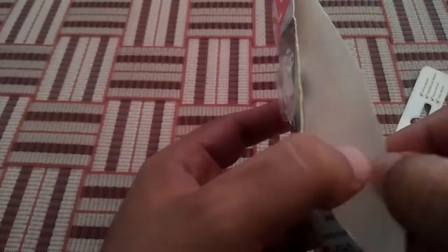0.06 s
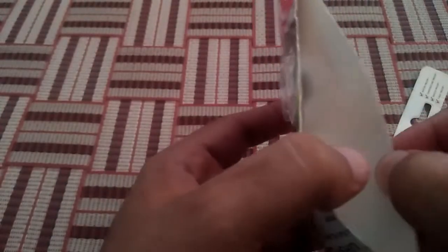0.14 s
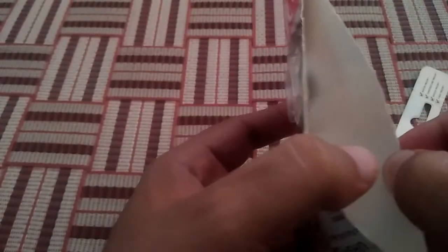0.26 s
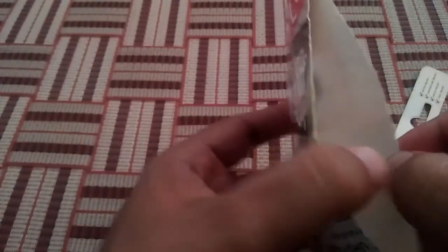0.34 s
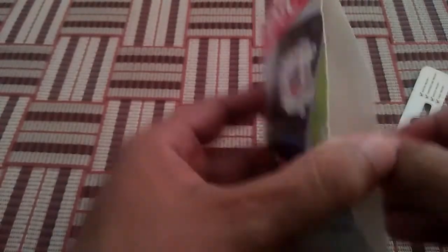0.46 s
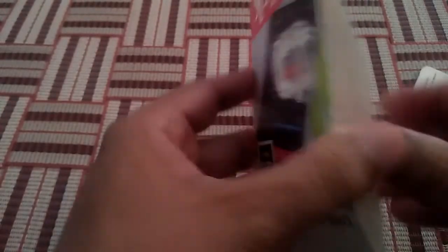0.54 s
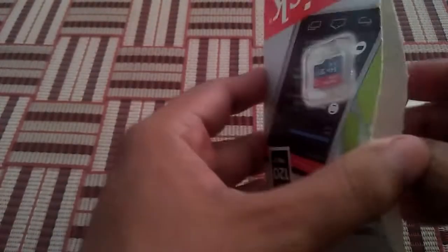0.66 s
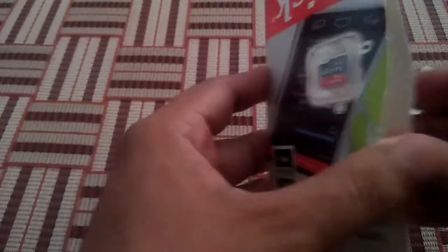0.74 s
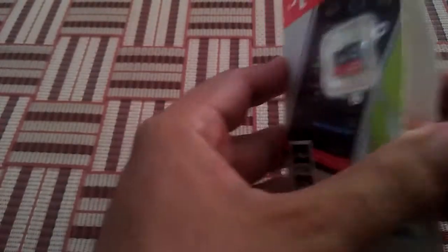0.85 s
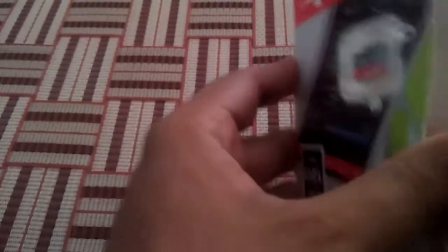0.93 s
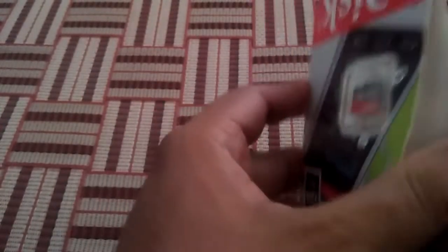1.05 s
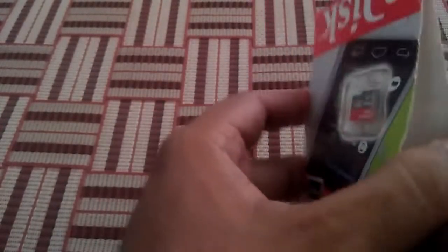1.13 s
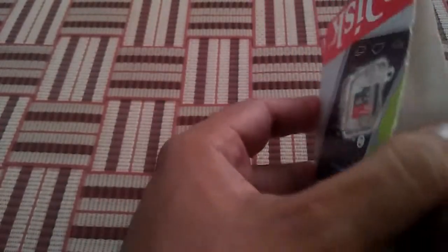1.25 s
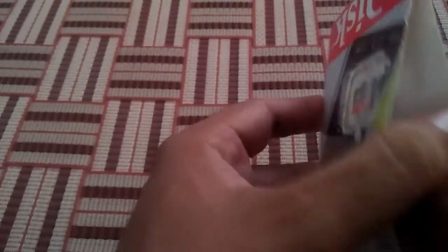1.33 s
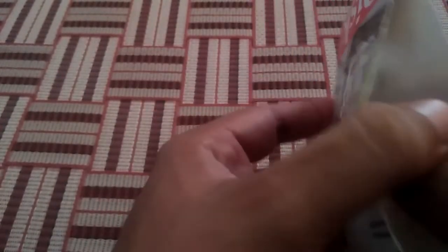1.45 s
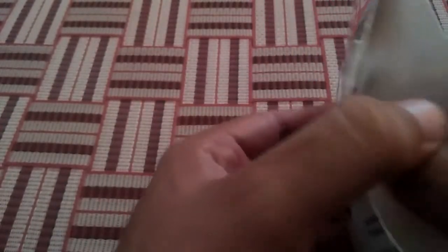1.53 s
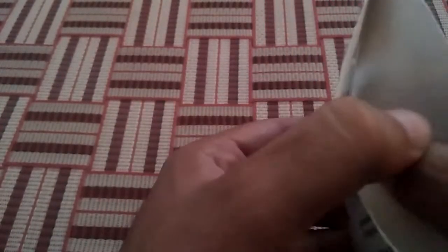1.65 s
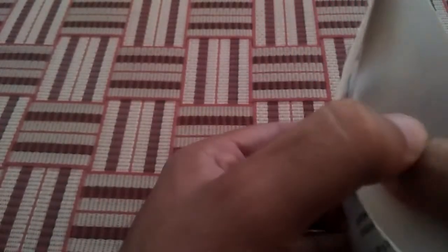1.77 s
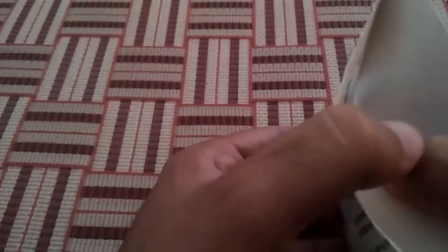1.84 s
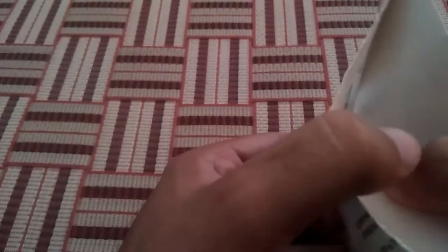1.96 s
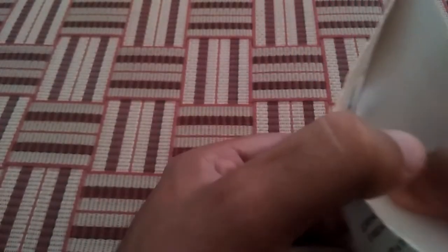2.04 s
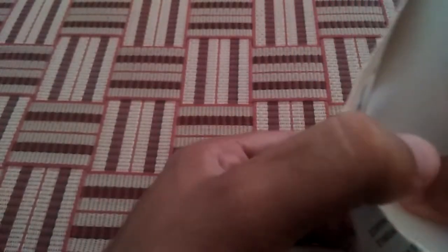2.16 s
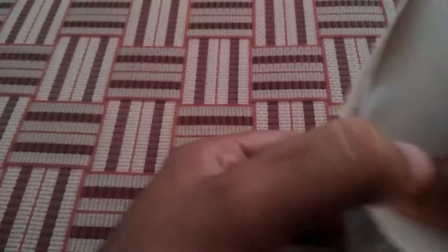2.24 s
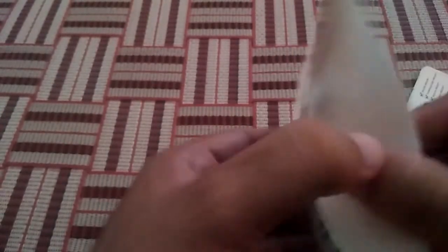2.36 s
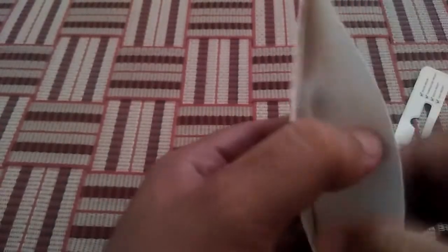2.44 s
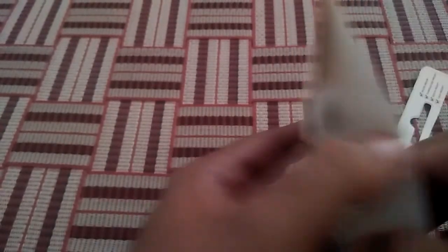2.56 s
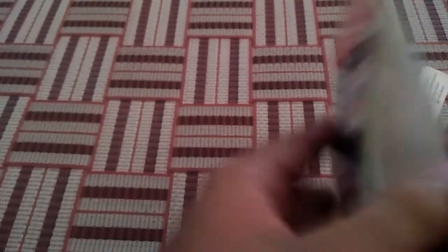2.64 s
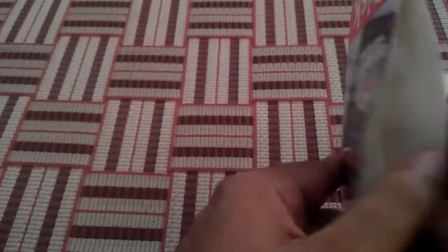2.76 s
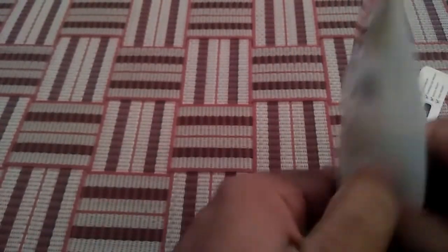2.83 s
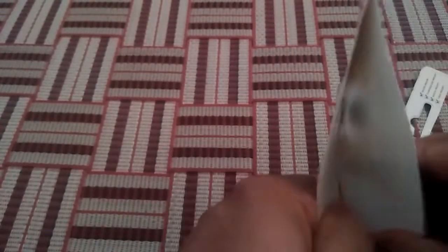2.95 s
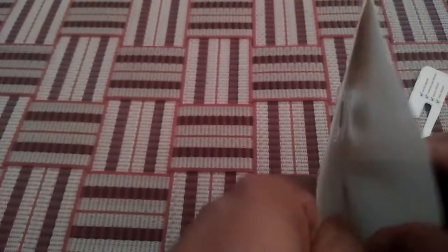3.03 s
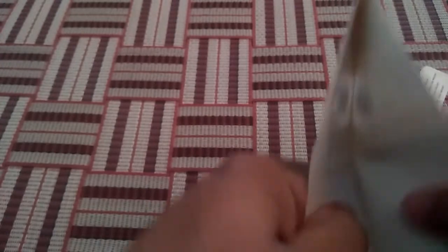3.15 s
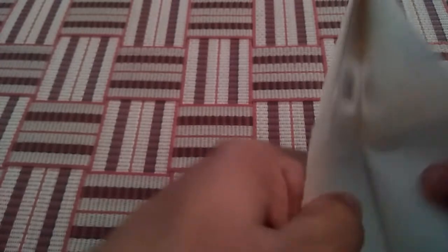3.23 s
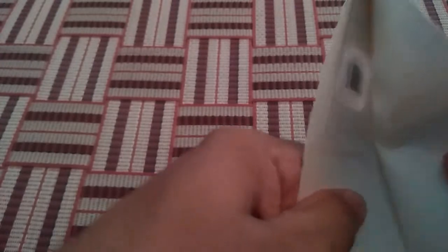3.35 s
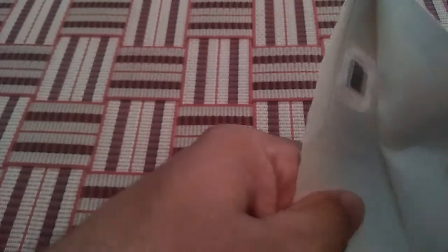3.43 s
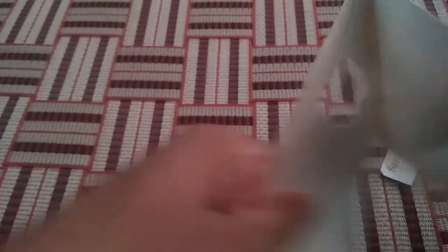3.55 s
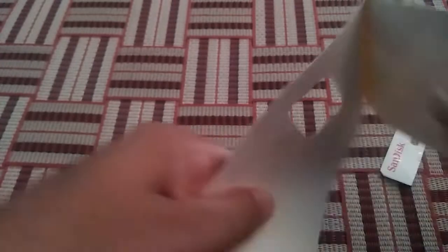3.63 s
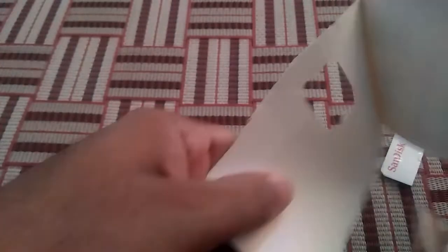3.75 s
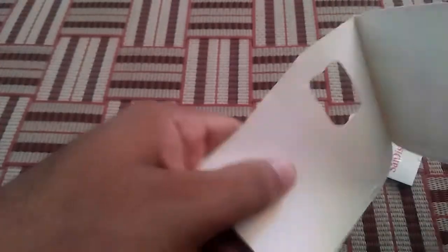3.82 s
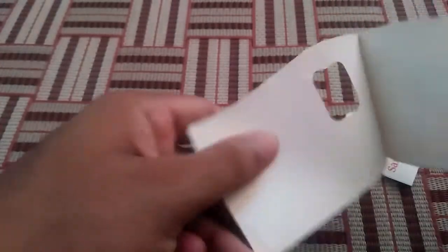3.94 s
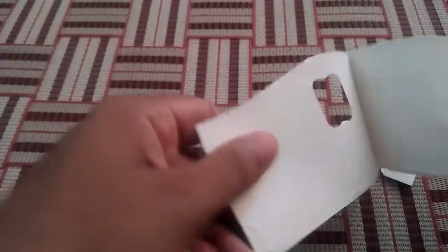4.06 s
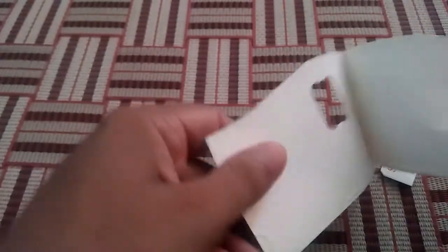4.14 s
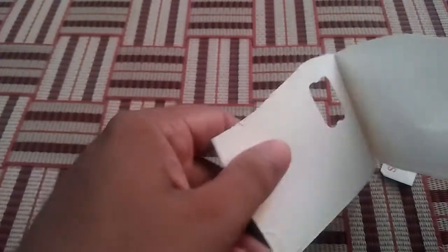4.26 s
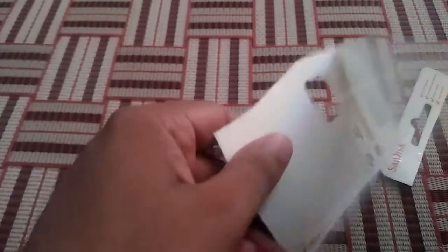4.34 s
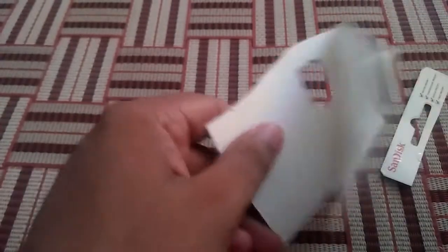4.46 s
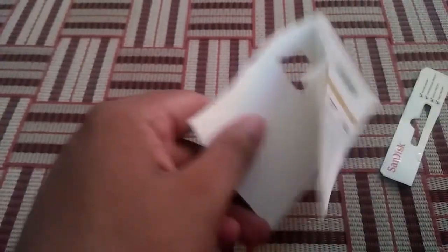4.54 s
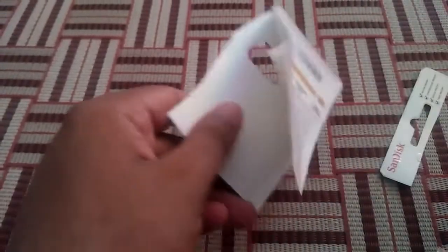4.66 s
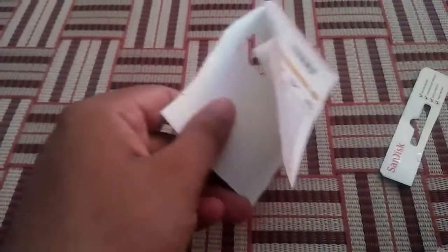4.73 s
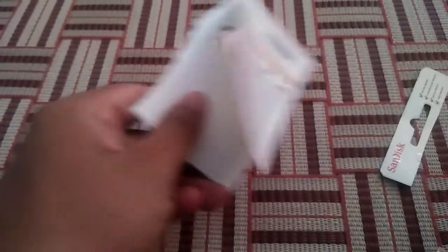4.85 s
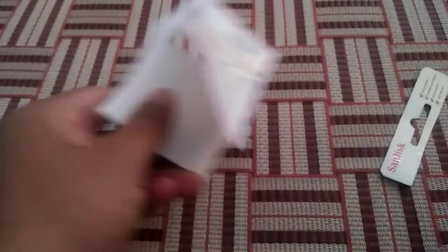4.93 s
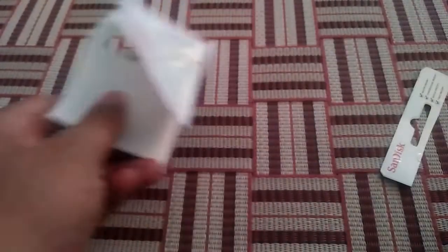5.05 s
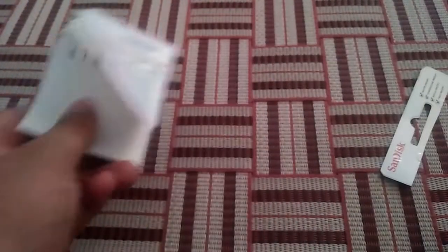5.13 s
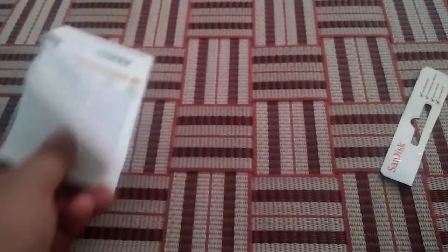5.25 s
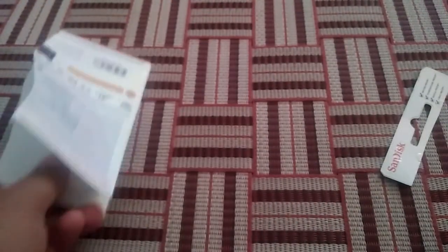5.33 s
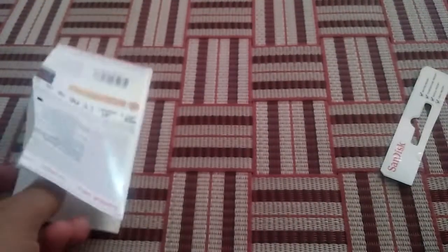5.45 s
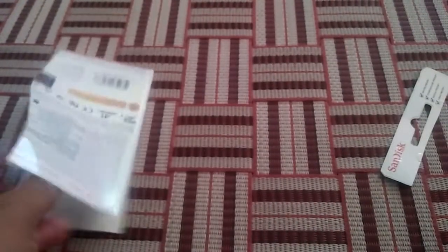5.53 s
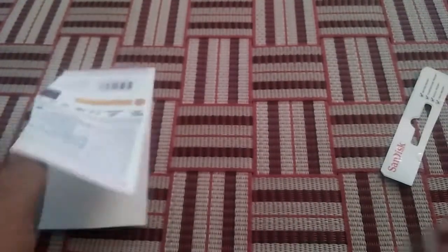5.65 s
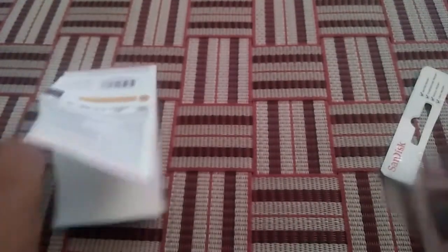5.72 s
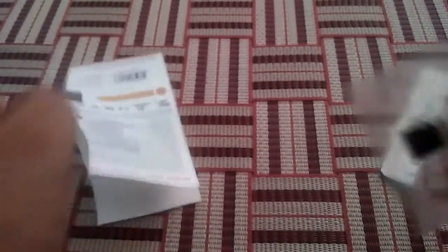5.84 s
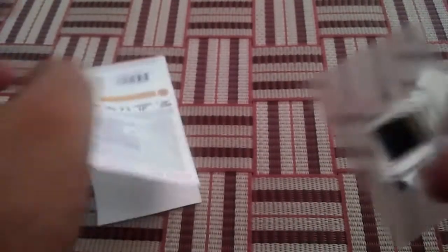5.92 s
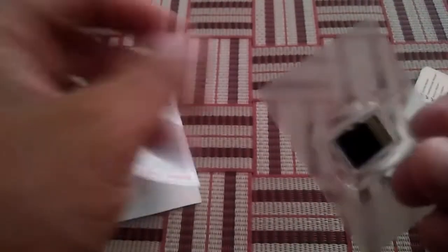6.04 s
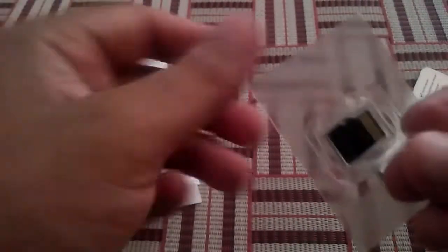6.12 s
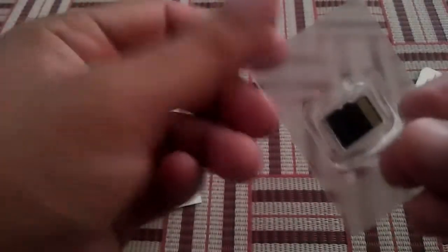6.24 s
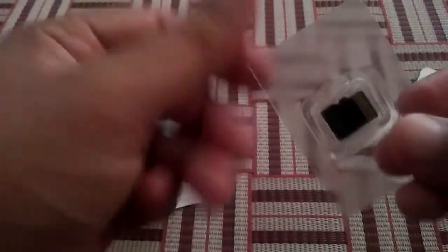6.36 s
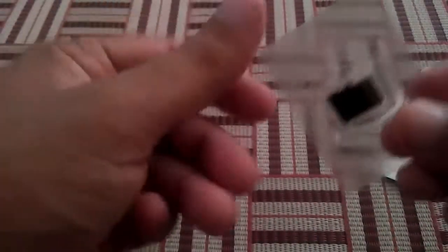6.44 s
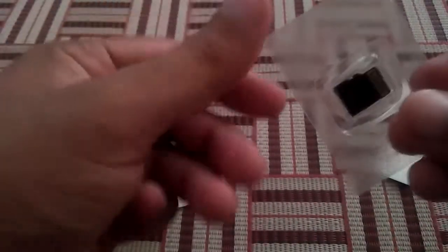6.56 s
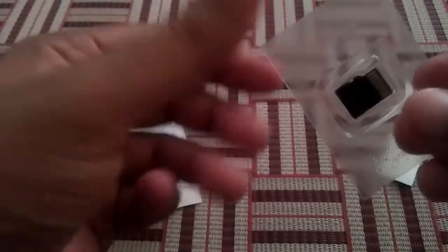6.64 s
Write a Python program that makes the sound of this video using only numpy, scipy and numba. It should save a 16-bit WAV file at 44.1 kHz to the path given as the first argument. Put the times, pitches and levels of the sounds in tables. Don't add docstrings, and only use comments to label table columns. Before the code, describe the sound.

Stiff cardboard packaging is opened by hand: bright clicks and faint rustling, a pause, a gentle fibrous peel dotted with crease snaps, then one hard crack and a fast tear ending in a cluster of plastic ticks. Afterwards come sparse paper flaps and clicks as it is set down. Close, dry, small-room sound with dull bumps from the support and a low room murmur.

```python
import sys
import numpy as np
from scipy import signal
from scipy.fft import rfft, irfft, next_fast_len
from scipy.io import wavfile
from scipy.ndimage import uniform_filter1d
from numba import njit

SR = 44100
rng = np.random.default_rng(int(sys.argv[2]) if len(sys.argv) > 2 else 0)


def store_wav(level_fs):
    pcm = np.round(np.clip(np.atleast_2d(level_fs), -1, 1) * 32767)
    wavfile.write(sys.argv[1], SR, pcm.T.astype(np.int16))


def boost_factor(decibels):
    exponent = np.asarray(decibels, float) / 20
    return 10 ** exponent


N = 294971

# time in seconds, level in dB, dullness in dB.
PEEL = [
    (1.76, -81, -1),
    (1.914, -63, -1),
    (2.075, -62.5, -3),
    (2.22, -57.5, -6),
    (2.275, -42.5, 1.5),
    (2.33, -61, 2.5),
    (2.45, -60.5, 3.5),
    (2.548, -57, 3),
    (2.595, -60.5, 1.5),
]


def level(x, db):
    return x * boost_factor(db) / np.sqrt(np.mean(x ** 2))


def even(x):
    return x / np.sqrt(uniform_filter1d(x ** 2, size=3000) + 1e-18)


def band(x, lo_hz, hi_hz, order=2):
    sos = signal.butter(order, [lo_hz, min(hi_hz, .45 * SR)], "band", fs=SR, output="sos")
    return signal.sosfilt(sos, x)


@njit
def svf(x, hz, width):
    y, b, l = np.empty(len(x)), 0., 0.
    for i in range(len(x)):
        g, k = np.tan(np.pi * hz[i] / SR), width / hz[i]
        v = (b + g * (x[i] - l)) / (1 + g * (g + k))
        b, l, y[i] = 2 * v - b, l + 2 * g * v, k * v
    return y


def walk(rate):
    k = int(SR / rate)
    held = np.repeat(rng.standard_normal(N // k + 1), k)
    return 1.3 * uniform_filter1d(uniform_filter1d(held, k), k)[:N]


def columns(table):
    s, *cols = np.transpose(table)
    return [np.interp(np.arange(N) / SR, s, c) for c in cols]


def fibres(rate, spread_db, puff_ms, bed_db):
    size_db = np.minimum(spread_db * rng.exponential(size=N), 22)
    sizes = (rng.random(N) < rate / SR) * boost_factor(size_db)
    puffs = signal.lfilter([1], [1, -np.exp(-1000 / puff_ms / SR)], sizes)
    return level(puffs, 0) + boost_factor(bed_db)


def pulls():
    # peak time in seconds, rise in ms, fall in ms, level in dB,
    # dullness in dB.
    handling = [(0.09, 81, 50, -65.5, -6.5), (0.18, 41, 60, -70, -6.5), (0.251, 31, 88.4, -45.5, 0),
                (0.385, 140, 30, -62, -8.5), (0.53, 30, 25, -65.5, 4.5), (0.69, 4.6, 45, -65, 6.5),
                (0.89, 43, 50, -49, 12), (1.025, 65, 40, -55, 9.5), (1.088, 54, 30, -63, -0.5),
                (1.163, 14, 22, -72.5, -1.5), (1.63, 150, 90, -78, 1.5), (2.79, 81, 90, -58, 1.5),
                (3.0, 62, 80, -57.5, 2), (3.075, 18, 130, -41, 0.5), (3.955, 29, 95, -52.5, 3.5),
                (4.15, 22, 15, -71, 2.5), (4.285, 37, 50, -71.5, -7.5), (4.437, 25.3, 25, -62, -6.5),
                (5.185, 30, 25, -73, -4.5), (5.212, 12, 75, -57.5, 3.5), (5.503, 44, 40, -64, 2.5),
                (5.753, 38, 75, -57, -2), (5.885, 15, 15, -78.5, -1)]
    # time in seconds, level in dB, dullness in dB.
    tear = [
        (3.202, -59, -4.5),
        (3.352, -56.5, -5),
        (3.524, -61.5, -3),
        (3.542, -54, -7.5),
        (3.622, -44, 3.5),
        (3.695, -27, 2),
        (3.755, -42, -0.5),
        (3.822, -54.5, 7),
        (3.928, -54.5, 1),
    ]
    edge_db, roundness = 20, 1.7
    body_per_quiet = 0.15
    t = np.arange(N) / SR
    total, dull = 1e-9, 0
    for peak, rise_ms, fall_ms, db, dull_db in handling:
        away = np.where(t < peak, (peak - t) / rise_ms, (t - peak) / fall_ms) * 1000
        drop_db = edge_db * np.minimum(away, 3) ** roundness
        gain = boost_factor(db - drop_db) * (away < 3)
        total = total + gain
        dull = dull + gain * (dull_db + body_per_quiet * np.minimum(drop_db, edge_db))
    for pull in (PEEL, tear):
        db, dull_db = columns(pull)
        active = 1. * (t > pull[0][0]) * (t <= pull[-1][0])
        gain = boost_factor(db) * uniform_filter1d(active, size=300)
        total, dull = total + gain, dull + gain * dull_db
    return total, dull / total


def rustle():
    # time in seconds, fold resonance in Hz, flap resonance in Hz.
    opening = [(0.1, 3480, 1040), (0.25, 5800, 1760), (0.4, 4800, 1290), (0.52, 2780, 940),
               (0.7, 3000, 1840), (0.9, 2950, 990), (1.03, 3350, 2150), (1.9, 5400, 2390),
               (2.25, 5100, 2060), (2.55, 5830, 1840), (2.8, 4880, 1200), (3.2, 3490, 1700),
               (3.59, 5200, 1800), (3.68, 4080, 1400), (3.85, 5670, 1200), (4.44, 3296, 1844),
               (5.25, 4000, 1980), (5.75, 6470, 1324)]
    # frequency in Hz, width in Hz, level in dB.
    card_modes = [
        (830, 470, 0.5),
        (2280, 510, -5.5),
    ]
    strength, dull_db = pulls()
    air_db = -3.5 - 1.1 * dull_db
    fold_hz, flap_hz = columns(opening)
    grain = fibres(rate=420, spread_db=3.8, puff_ms=1.2, bed_db=0.5)
    grain = even(grain * boost_factor(2.2 * walk(35)))
    rub = grain * rng.standard_normal(N)

    body = boost_factor(-1.5) * svf(svf(rub, flap_hz, 1100.0), flap_hz, 1100.0)
    for hz, width_hz, db in card_modes:
        drive = np.minimum(hz / flap_hz, 1) ** 2.1
        body = body + boost_factor(db) * drive * svf(rub, np.full(N, 1. * hz), 1. * width_hz)

    above = svf(svf(rub, 1.22 * fold_hz, 3400.0), 1.213 * fold_hz, 3400.0)
    above = above + boost_factor(-4.0) * svf(svf(rub, 1.7 * fold_hz, 6000.), 1.7 * fold_hz, 6000.)
    first = svf(svf(rub, fold_hz, 1000.), fold_hz, 1000.)
    fold = boost_factor(-1.5 * np.maximum(dull_db, 0)) * above + boost_factor(-1.5) * first

    air = band(rub, 5700, 21000) + boost_factor(-2.0) * svf(rub, 9800 + 1500 * walk(3.8), 730.0)
    mix = even(fold) + boost_factor(.6 * dull_db - 1.5) * even(body) + boost_factor(air_db + 4.0) * even(air)

    begin, end = PEEL[0][0], PEEL[-1][0]
    peeling, = columns([(begin - .1, 0), (begin, 1), (end, 1), (end + .1, 0)])
    gap_depth, gap_width_hz = .75, 1100.
    mix = mix - gap_depth * peeling * svf(mix, (fold_hz + flap_hz) / 2, gap_width_hz)
    return strength * mix


def snap(peak_db, ring_hz, air_db, thud_db, noise):
    t = np.arange(noise.shape[1]) / SR
    fade = np.minimum(t / 0.00061, 1) * np.exp(-t / 0.0022)
    slow = np.minimum(t / .002, 1) * np.exp(-t / .003)
    ring = svf(fade * noise[0], np.full(len(t), 1. * ring_hz), 0.11 * ring_hz)
    crack = band(fade * noise[0], 1000, np.clip(2.6 * ring_hz, 4000, 9000))
    air = band(fade ** 0.8 * noise[1], 6000, 18000)
    thud = band(slow * noise[2], 550, 1300)
    weights = boost_factor(np.array([-4., -7., air_db + 2.5, thud_db + 0.14]))
    parts = (ring, crack, air, thud)
    return boost_factor(peak_db) * sum(w * p / np.abs(p).max() for w, p in zip(weights, parts))


def snaps():
    # start in seconds, peak in dB, ring in Hz, air in dB.
    grip = [(0.0297, -46, 10180, -9.5), (0.0706, -55.5, 9180, -10.5), (0.17, -48.5, 9130, -2),
            (0.2253, -36.5, 6875, -18), (0.2497, -31.5, 7050, -30), (0.2881, -32, 7460, -25),
            (0.2984, -30.5, 14000, -15), (0.3074, -33.5, 6980, -21), (0.3645, -36.5, 9470, -10.5),
            (0.5201, -50, 1400, -29.5), (0.6887, -39, 1920, -44), (0.7172, -51, 2850, -32.5),
            (0.8673, -35, 1000, -19.5), (0.9052, -31.5, 1907, -23.5), (4.4352, -42, 1862, -18),
            (4.8873, -57.5, 1320, -27.5), (5.1905, -51.5, 6300, 0), (5.2078, -28.5, 3600, -10.5),
            (5.2275, -42.5, 2252, -10), (5.25, -34, 2382, -8), (5.2552, -37, 3900, -18),
            (5.3012, -60, 6605, -12), (5.4734, -49.5, 2550, -5.5), (5.4973, -32, 3488, -9.5),
            (5.7379, -50.5, 7040, -15), (5.7516, -36, 6670, -14), (5.7797, -38, 2833, -6),
            (5.8176, -49.5, 1530, -16), (5.9488, -49.5, 1433, -28.5)]
    creases = [(1.4851, -45.5, 1816, -14), (1.544, -50.5, 1846, -7.5), (1.5772, -43.5, 1980, -27),
               (1.617, -56, 5500, -6.5), (1.7429, -57, 5200, -5.5), (1.7718, -46.5, 2272, -21),
               (1.806, -47.5, 5160, -9.5), (1.8326, -55.5, 4740, -13.5), (1.8683, -45.5, 1998, -24.5),
               (1.897, -41, 2240, -22), (1.915, -46, 2187, -10.5), (1.9578, -33.5, 5980, -11),
               (2.0533, -36, 4900, 1.5), (2.114, -38.5, 10590, -6), (2.1957, -37, 5250, -11),
               (2.2607, -34.5, 2035, -6.5), (2.318, -34, 1700, -24.5), (2.3395, -41, 2400, -5.5),
               (2.3605, -27, 13000, -4.5), (2.3867, -41.5, 2080, -5), (2.4229, -27, 1940, -24),
               (2.4722, -30, 2083, -6), (2.5498, -38, 1779, -12), (2.681, -49, 2434, -11.5),
               (2.7794, -45, 2320, -11.5), (2.989, -37.5, 2264, -3)]
    rip = [(3.0664, -24, 3900, -6), (3.0778, -8.5, 1696, -14), (3.085, -25, 4070, -17),
           (3.1122, -19, 1840, -11), (3.249, -45, 3440, 7), (3.2818, -34.5, 1900, -13),
           (3.311, -36.5, 3340, -8), (3.3818, -34, 1870, -19), (3.53, -31, 6110, -10),
           (3.5714, -31, 3270, -13.5), (3.6725, -13, 1747, -11), (3.695, -11, 6500, -13),
           (3.7076, -25, 1180, -11), (3.7144, -12.5, 3930, -10.5), (3.7272, -18.5, 1239, -17),
           (3.7404, -19.5, 4708, -8.5), (3.7472, -26.5, 4580, -13), (3.7634, -26.5, 5430, -17.5),
           (3.849, -27.5, 1100, 0.5), (3.8817, -31, 5150, -20.5), (3.9306, -30.5, 6990, -15),
           (3.939, -20.5, 5300, -19.5), (3.945, -24, 6780, -14.5), (3.9571, -21.5, 6860, -12.5),
           (3.9614, -26, 4466, -16), (3.973, -29, 6800, -21.5), (3.9779, -26, 5540, -24.5),
           (3.9837, -27.5, 6590, -21), (4.0276, -39, 4010, -13), (4.0805, -55.5, 1244, -11.5)]
    out = np.zeros(N + 4096)
    for s, peak_db, ring_hz, air_db in np.vstack([grip, creases, rip]):
        start = int(s * SR)
        thud_db = 1 - 17 * np.log2(ring_hz / 1000)
        noise = rng.standard_normal((3, 2048))
        out[start:start + 2048] += snap(peak_db, ring_hz, air_db, thud_db, noise)
    return out[:N]


def bumps():
    # start in seconds, peak in dB, frequency in Hz.
    thumps = [(0.019, -67, 51.1), (0.096, -73, 55.5), (0.809, -52, 57.4), (0.918, -53, 61),
              (1.098, -68.5, 56.5), (1.187, -57, 51.1), (1.45, -51.5, 53.5), (2.17, -64, 55),
              (2.3, -58.5, 60.3), (2.449, -58, 52.4), (2.75, -71.5, 50.6), (3.077, -36, 161),
              (3.298, -52.5, 49.6), (3.4, -59.5, 50), (3.5, -63.5, 53), (3.641, -49, 108),
              (3.67, -35.5, 120), (3.707, -36.5, 77), (3.842, -25, 281), (3.941, -34.5, 123),
              (4.276, -41.5, 73.6), (4.748, -69.5, 58.7), (4.908, -72, 55.6), (5.194, -50.5, 51.1),
              (5.33, -46, 51.7), (5.469, -47, 55), (5.747, -57.5, 109), (5.949, -50, 62.6)]
    rest_db, sway_db, limit_db, sway_s = -76, -11, -42.5, 0.073
    t = np.arange(N) / SR
    low = boost_factor(rest_db)
    for s, peak_db, _ in thumps:
        low = low + boost_factor(min(peak_db, limit_db) + sway_db) * (t > s) * np.exp(-np.abs(t - s) / sway_s)
    low = uniform_filter1d(low, size=1500)
    push = boost_factor(3.8 * walk(7.2))
    sway = level(band(rng.standard_normal(N), 42, 69, order=3), 0)
    knock = level(band(rng.standard_normal(N), 54, 320), -4.5) * boost_factor(0.83 * walk(36))
    out = low * push * (sway + knock)
    for s, peak_db, hz in thumps:
        cycles = np.maximum(t - s, 0) * hz
        swing = np.sin(2 * np.pi * cycles) + .4 * np.sin(2 * np.pi * 2.3 * cycles)
        out = out + boost_factor(peak_db + 7.0) * cycles * np.exp(-cycles / .7) * swing
    return out


def room_tone():
    # frequency in Hz, density in dB per Hz.
    room = [(120, -52), (200, -39), (282, -0.5), (363, -5), (435, -8), (734, -5.5), (998, -2.5),
            (1490, -14), (1880, -13.5), (2090, -19.5), (3010, -27.5), (3670, -35), (8120, -31),
            (15000, -37.5)]
    # start in seconds, end in seconds, frequency in Hz, level in dB.
    hum = (6.42, 6.55, 640, -74)
    swell = walk(0.9)
    hz, db = np.transpose(room)
    size = next_fast_len(N)
    octave = np.log2(np.fft.rfftfreq(size, 1 / SR) + 1)
    spectrum = rfft(rng.standard_normal(size)) * boost_factor(np.interp(octave, np.log2(hz), db))
    out = irfft(spectrum, size)[:N]
    for centre in np.arange(7.5, 11.6, 1 / 3):
        share = np.cos(np.pi / 2 * np.clip(3 * (octave - centre), -1, 1)) ** 2
        flicker = boost_factor(.9 * swell + .7 * walk(3) + 2.8 * walk(18))
        out = out + irfft(spectrum * share, size)[:N] * (flicker - 1)
    start, end, whine_hz, whine_db = hum
    t = np.arange(N) / SR
    arch = np.sin(np.pi * np.clip((t - start) / (end - start), 0, 1))
    whine = arch * np.sin(2 * np.pi * whine_hz * t)
    return level(out, -67) + boost_factor(whine_db) * whine


def scene():
    pack = rustle() + snaps()
    t = np.arange(SR // 2) / SR
    t60_s, echo_db = 0.14, -17
    decay = (t > .003) * np.exp(-np.log(1000) * t / t60_s)
    echo = band(rng.standard_normal(len(t)), 500, 5200) * decay
    wet = signal.fftconvolve(pack, echo / np.sqrt(np.sum(echo ** 2)))[:N]
    mono = pack + boost_factor(echo_db) * wet + bumps() + room_tone()
    return np.array([mono, mono])


def swap_noise(mono, size=2048, group=48):
    swap_hz = [4300, 5000, 7000, 9200, 14000]
    swap_share = [0.07, .18, .32, 0.36, 0.6]
    hz, _, spec = signal.stft(mono, SR, nperseg=size)
    power = uniform_filter1d(np.abs(spec) ** 2, group, axis=0)
    frames = spec.shape[1]
    chance = uniform_filter1d(rng.standard_normal((len(hz) // group + 1, frames)), size=2, axis=1)
    rank = chance.argsort(axis=1).argsort(axis=1) / frames
    rank = np.repeat(rank, group, axis=0)[:len(hz)]
    short = np.add.reduceat(np.diff(mono, prepend=0) ** 2, np.arange(0, N, size // 16)) + 1e-18
    jump = short / (uniform_filter1d(short, size=24) + 1e-18)
    attack = np.convolve(jump > 7.5, np.ones(12), "same")[::8] > 0
    steady = ~np.resize(attack, frames)
    patch = (rank < np.interp(hz, swap_hz, swap_share, left=0)[:, None]) & steady
    shape = np.sqrt(uniform_filter1d(short, size=2) / (uniform_filter1d(short, size=16) + 1e-18))
    shape = np.repeat(shape, size // 16)[:N]
    sides = []
    for _ in range(2):
        _, _, noise = signal.stft(shape * rng.standard_normal(N), SR, nperseg=size)
        noise = noise * np.sqrt(power / np.mean(np.abs(noise) ** 2))
        sides.append(signal.istft(np.where(patch, noise, spec), SR, nperseg=size)[1][:N])
    return np.array(sides)


def top_cut(x):
    return signal.sosfilt(signal.butter(12, 15640, fs=SR, output="sos"), x)


def record(dry):
    dipped = dry[0] - .85 * svf(dry[0], np.full(N, 372.), 55.)
    low_pass = signal.ellip(8, .2, 42, 14350, fs=SR, output="sos")
    mix = signal.sosfilt(low_pass, swap_noise(dipped))
    return top_cut(mix)


dry = scene()
out = record(dry)
store_wav(out)
```